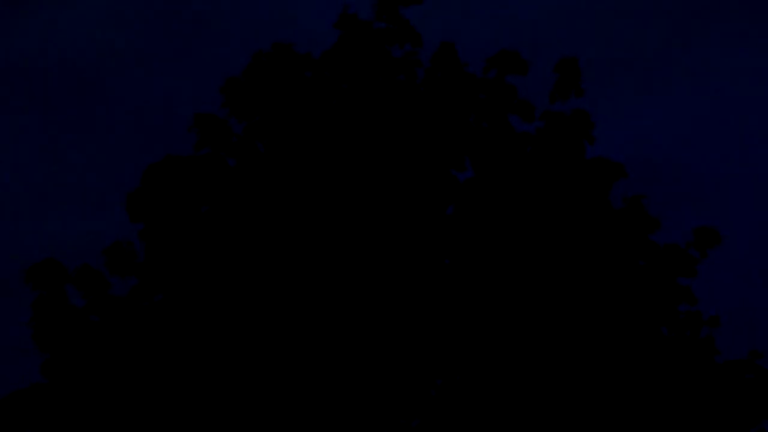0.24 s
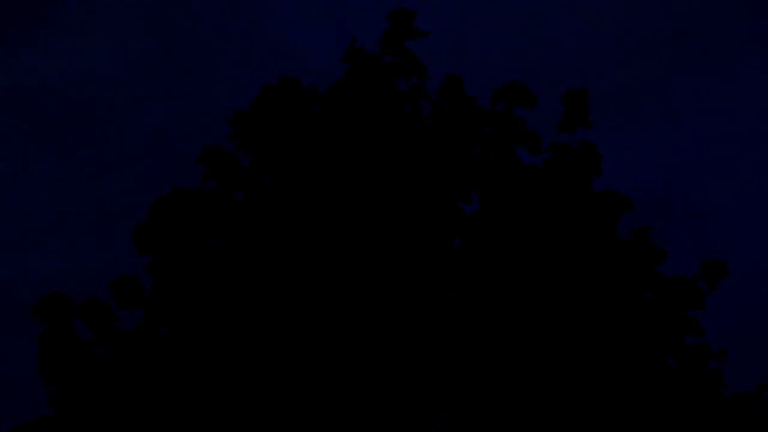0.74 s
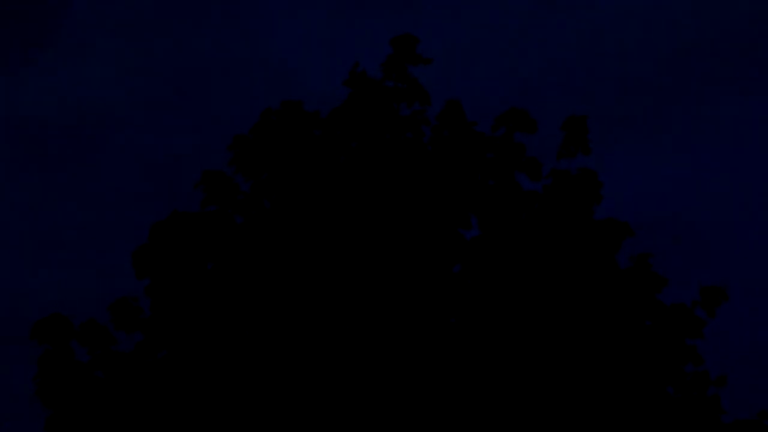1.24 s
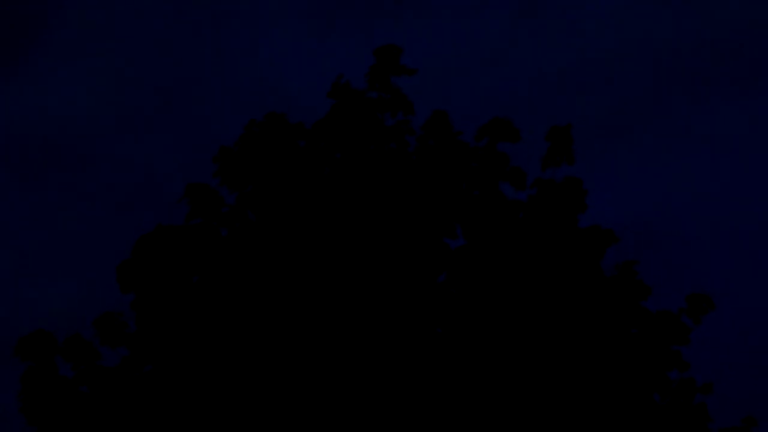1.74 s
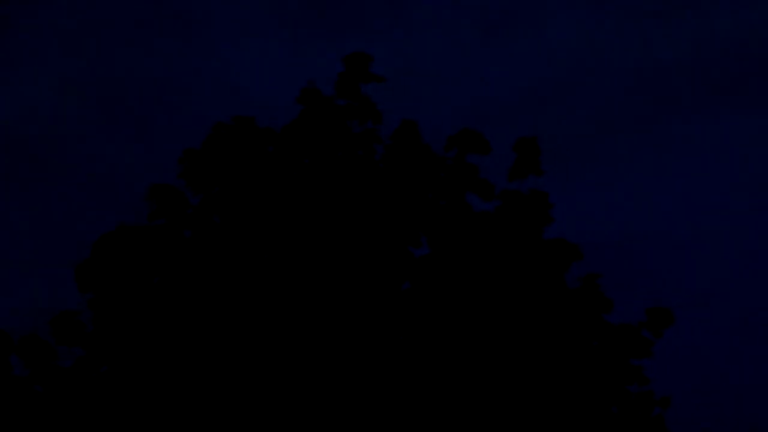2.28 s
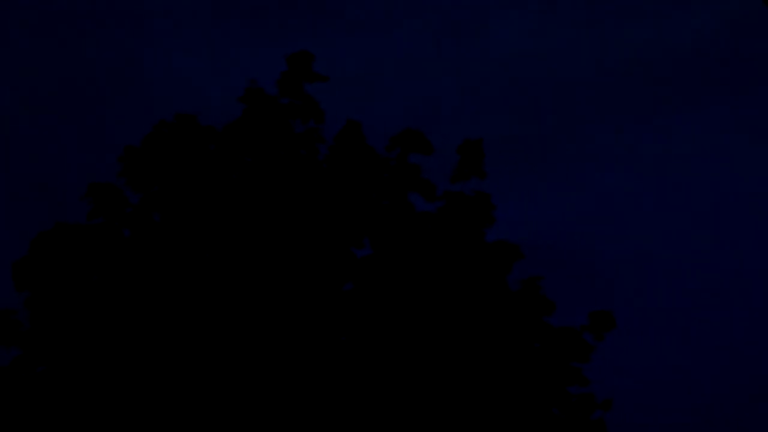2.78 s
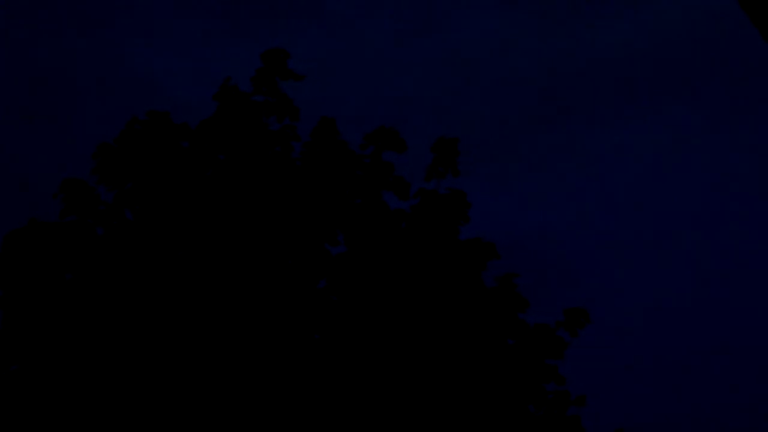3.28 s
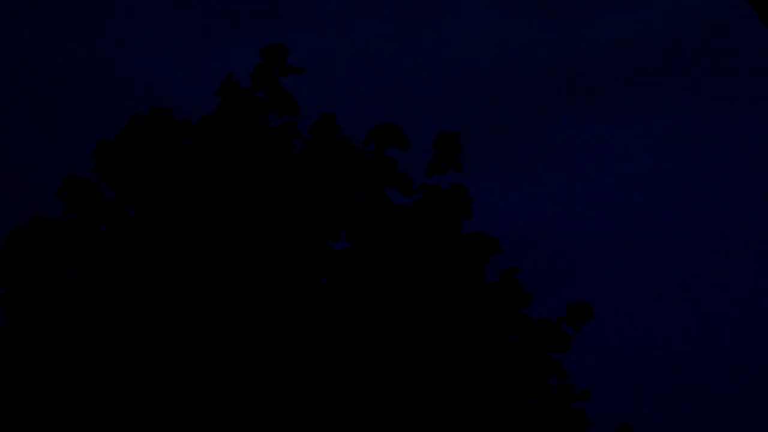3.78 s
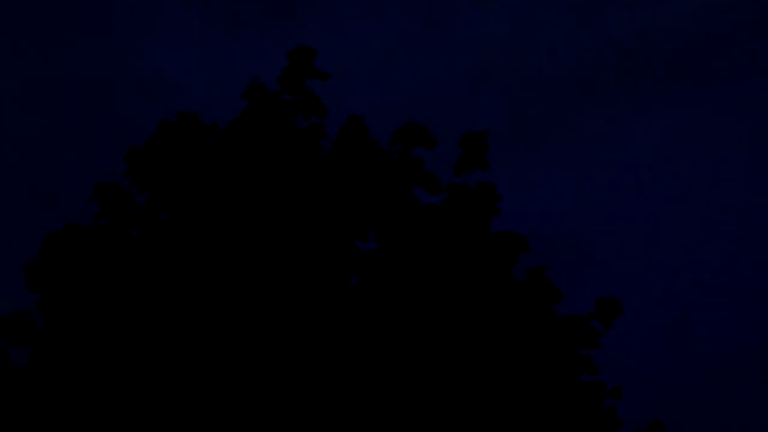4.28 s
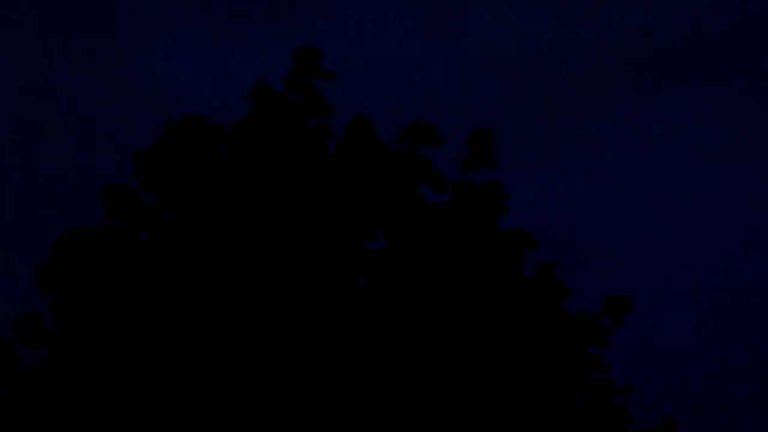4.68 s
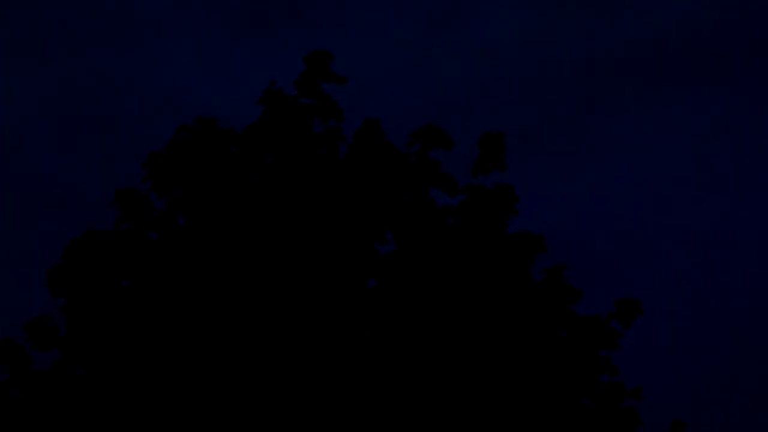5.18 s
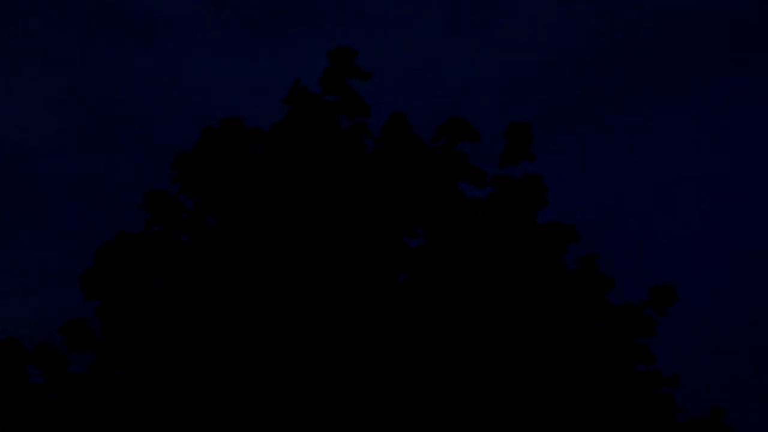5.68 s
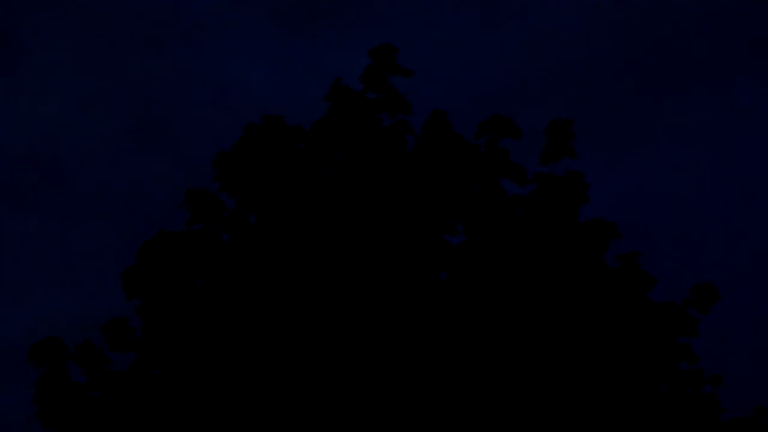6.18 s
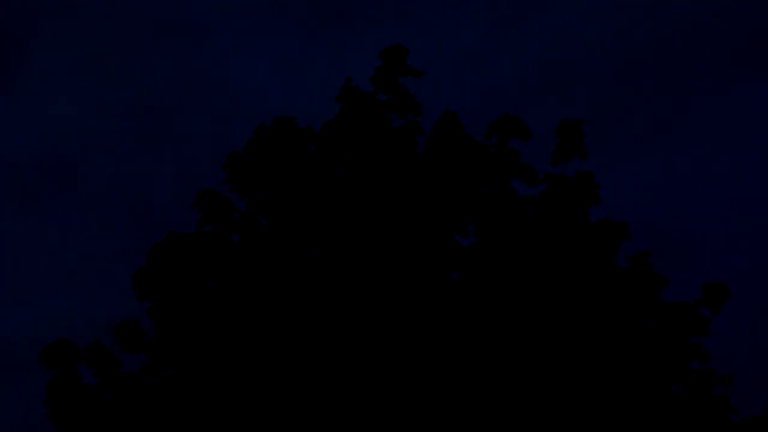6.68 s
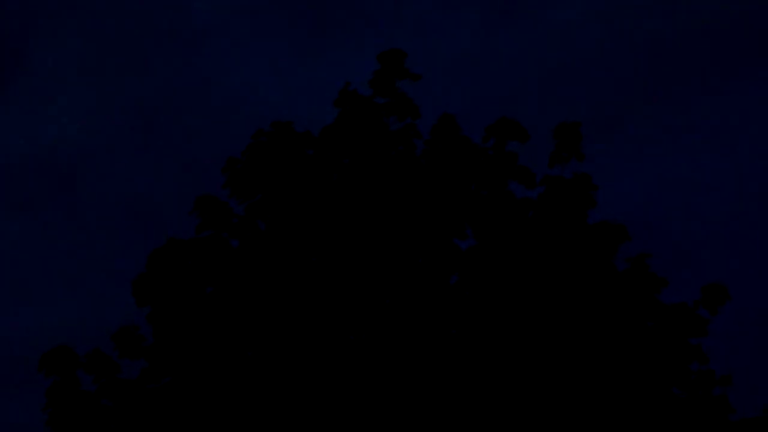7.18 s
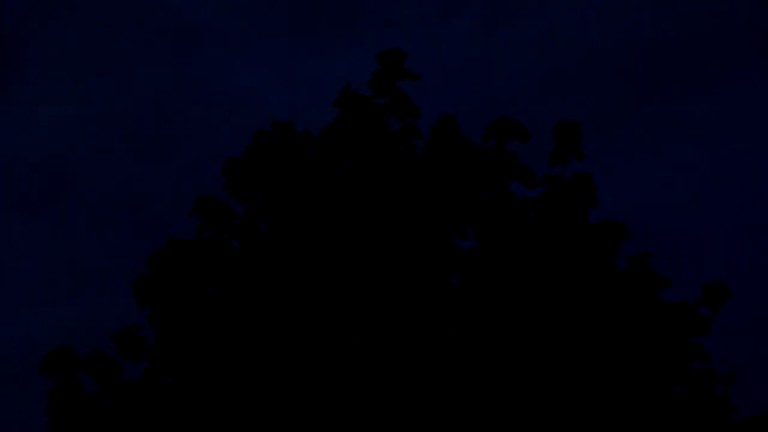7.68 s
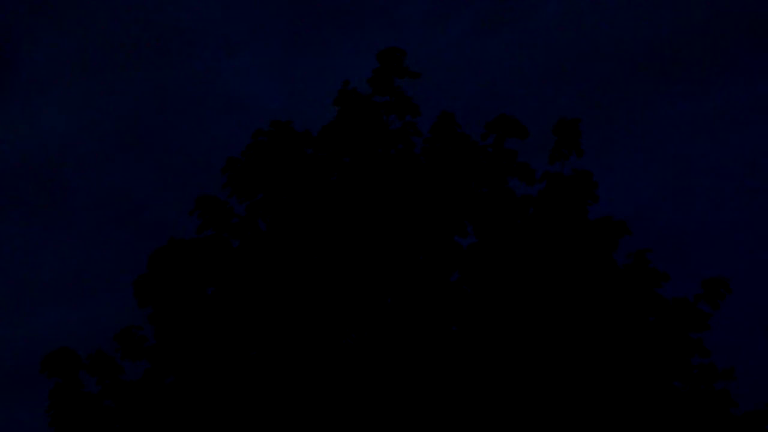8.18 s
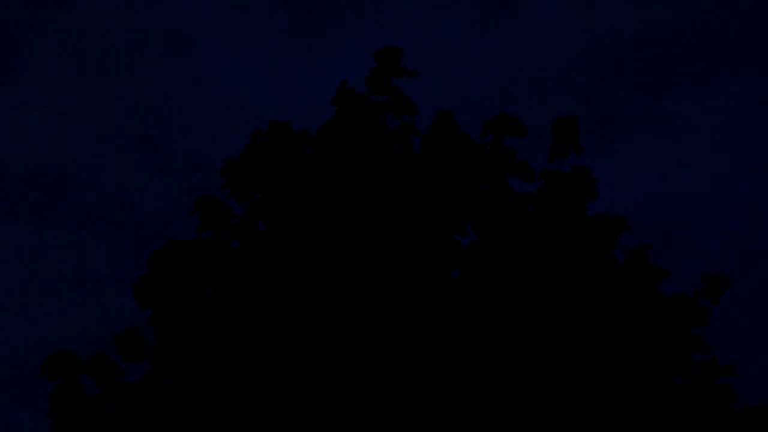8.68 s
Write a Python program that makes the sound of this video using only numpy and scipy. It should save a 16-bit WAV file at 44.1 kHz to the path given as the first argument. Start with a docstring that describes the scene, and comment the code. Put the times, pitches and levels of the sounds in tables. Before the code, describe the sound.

From a window facing dark trees, a small hand-held camera picks up a soft, reverberant dawn chorus. Clear, fluttering whistles slide briefly up or down among blurred warbles and countless distant notes. Handling knocks and a crisp plastic crackle occur in the first second, with lighter taps around five to six seconds. Birdsong is strongest near two and seven seconds and sparser at the end. Constant hiss, a thin whine, frame buzz and low hum lie beneath.

```python
"""Thrush-like whistlers sing a dawn chorus in the trees, heard from a window through a small hand-held camera.
Nearer birds are gliding sines with fluttering paths, blurred warbles are runs of scattered syllables, and a
far crowd is thousands of short random notes; noise-like echoes from trees and walls smear them all.
Beneath lie a faint town wash of shaped noise, low wavering sines, brief case taps and two high bird chips
(wavelets), a plastic crackle (ringing modes), and the camera's own hiss, whine and frame-rate buzz."""
import sys
import numpy as np
from scipy import signal
from scipy.fft import rfft, irfft
from scipy.io import wavfile
from scipy.ndimage import uniform_filter1d

SR = 44100
rng = np.random.default_rng(int(sys.argv[2]) if len(sys.argv) > 2 else 0)


def wav_record(signal):
    """Record a signal, one row per channel, as 16-bit PCM in the file named by sys.argv[1]."""
    frames = np.transpose(np.atleast_2d(signal))
    bounded = np.clip(frames, -1, 1)
    # unit amplitude maps onto the largest positive 16-bit level
    quanta = np.round(bounded * 32767).astype(np.int16)
    wavfile.write(sys.argv[1], SR, quanta)


N = 394254  # length in samples

# Far crowd's level in time: [t/s, level/dB]
CROWD_LEVEL = [(0.0, -55), (1.57, -55), (1.94, -55), (2.34, -55), (2.46, -50), (3.56, -58), (5.57, -54.5),
               (6.03, -55.5), (7.24, -51.5), (7.57, -52), (8.94, -57)]
# Loudness of a far note by its pitch: [f/Hz, level/dB]
CROWD_PITCH = [(1300, -25.5), (1500, -8), (1750, -1.5), (2000, 3), (2500, -3.5), (3000, -10.5), (3500, -21)]
# Distant wash, relative spectral density: [f/Hz, level/dB per Hz]
TOWN_SPECTRUM = [(20, 3), (100, -1.5), (290, -1.5), (420, -5.5), (1100, -2), (1600, -9), (3000, -10),
                 (5000, -41)]
# Wavering low hums, some of them probably camera frame buzz: [f/Hz, level/dB]
LOW_HUMS = [(99, -76.5), (128, -76), (190, -78), (232, -76), (293, -76)]
# Camera hiss, relative spectral density: [f/Hz, level/dB per Hz]
HISS_SPECTRUM = [(40, -0.5), (300, 7.5), (1000, 5.5), (2000, 2.5), (3600, 2), (5000, 0), (8000, -0.5),
                 (11000, -1), (14000, -1)]
# Clear whistles of nearer birds:
# [start t/s, length t/s, start f/Hz, end f/Hz, level/dB, scattered-to-direct sound ratio]
CLEAR_NOTES = [(.22, 0.15, 1820, 1780, -55, 1.3), (.449, 0.062, 1510, 1480, -56, 0.91),
               (0.468, 0.14, 2550, 2490, -57.5, 1.4), (.5, 0.11, 2080, 2450, -54, 1.2),
               (.688, 0.18, 2070, 2040, -59, .45), (.778, 0.17, 2970, 2870, -60, 1.24),
               (.843, 0.09, 2240, 2190, -54.5, 0.84), (0.956, 0.12, 2860, 2810, -58.5, 1.1),
               (1.14, 0.16, 2410, 2160, -58, .8), (1.491, 0.093, 2724, 2096, -50, 0.68),
               (1.55, 0.1, 2780, 3100, -61, .8), (1.622, 0.17, 3120, 3230, -60, 1.2),
               (1.743, 0.17, 2140, 2120, -47, 0.38), (1.876, .05, 2695, 2450, -47.5, .45),
               (1.91, 0.077, 2430, 2398, -42, 0.19), (1.894, .062, 3130, 3100, -58, .6),
               (1.98, 0.23, 2150, 2100, -50, 0.41), (2.038, 0.11, 2240, 2270, -53, 0.99),
               (2.097, .134, 1310, 1358, -56.5, 0.61), (2.23, 0.15, 3030, 3000, -60, .86),
               (2.286, 0.14, 1750, 1810, -41.5, 0.65), (2.297, 0.14, 2450, 2260, -46, .8),
               (2.409, 0.12, 1780, 1740, -47, 0.91), (2.599, .1, 1950, 1930, -55, .8),
               (2.359, 0.13, 3020, 3104, -50, 0.41), (2.475, .07, 4070, 4050, -62, .8),
               (2.496, 0.19, 3330, 3330, -59.5, 0.53), (2.49, 0.17, 3110, 3130, -53.5, 0.39),
               (2.603, 0.093, 4110, 4140, -65, 0.77), (2.654, 0.14, 3100, 3100, -61, 0.99),
               (2.722, 0.15, 3300, 3350, -62, 1.2), (2.8, 0.085, 2640, 2600, -53, .6),
               (2.847, 0.07, 1334, 1290, -56, .25), (2.877, 0.1, 3100, 3020, -67, 0.73),
               (3.008, 0.16, 4140, 3990, -62.5, 1), (3.048, 0.12, 3410, 3280, -58.5, .6),
               (3.122, 0.13, 5110, 5150, -65.5, 0.96), (3.175, .06, 4260, 4230, -66, .7),
               (3.173, 0.095, 2160, 2050, -50, 1.1), (3.23, 0.074, 3320, 2790, -52, .45),
               (3.276, .2, 2790, 2640, -57.5, 0.7), (3.961, 0.19, 1950, 1900, -52, 1.1),
               (4.066, 0.14, 2170, 2190, -57.5, 0.5), (4.172, 0.12, 3120, 2360, -57, .42),
               (4.327, 0.1, 1950, 1930, -51.5, 0.52), (4.6, 0.2, 2088, 2110, -53.5, 0.72),
               (4.71, 0.068, 2660, 2670, -68, .6), (4.869, 0.073, 2310, 2330, -59, .3),
               (4.87, .155, 1483, 1530, -55, .4), (5.138, 0.11, 2100, 1990, -52, 1.0),
               (5.163, .065, 1530, 1530, -59, 0.9), (5.29, 0.068, 3110, 2820, -58, 0.45),
               (5.33, 0.16, 2006, 2020, -57, 0.77), (5.39, .07, 2370, 2360, -61, 0.53),
               (5.588, .053, 2400, 2950, -58.5, 0.65), (5.613, 0.14, 2960, 2990, -58.5, 0.57),
               (5.755, 0.1, 2880, 2960, -61, 0.58), (5.799, 0.077, 1965, 1950, -52.5, 0.5),
               (5.932, 0.135, 1887, 1950, -52.5, .25), (5.9, 0.08, 3080, 3200, -69, 0.74),
               (6.067, .13, 1920, 1720, -57, 0.79), (6.231, 0.16, 2156, 2120, -52, .4),
               (6.32, 0.092, 1720, 1900, -53, .9), (6.447, 0.098, 2700, 2550, -59, 0.53),
               (6.55, 0.077, 2134, 2135, -50, 0.7), (6.618, .12, 2680, 2600, -60, 0.55),
               (6.67, 0.078, 1967, 1945, -46.5, .8), (6.73, 0.088, 1950, 1803, -43, 0.64),
               (6.746, 0.14, 2340, 2750, -53, 0.52), (6.816, .15, 2172, 1800, -47.5, 1),
               (6.869, 0.094, 2730, 3190, -48, 0.59), (6.96, .07, 3180, 3130, -59, 1.0),
               (6.984, 0.08, 2273, 2220, -43, .41), (6.985, 0.16, 2690, 2430, -41.5, .42),
               (7.098, 0.19, 1785, 2150, -51, 0.8), (7.128, 0.12, 2430, 2368, -40, 0.29),
               (7.225, 0.12, 2840, 2790, -48, 0.86), (7.335, 0.047, 3490, 2690, -48.5, .5),
               (7.368, .08, 2720, 2280, -44.5, .9), (7.43, 0.095, 2810, 3250, -52.5, .58),
               (7.524, 0.071, 3320, 3240, -58, .7), (7.633, 0.054, 3327, 3830, -65, .7),
               (7.725, 0.11, 2390, 2310, -53, .7), (7.96, .089, 1205, 1800, -52.5, 1.3),
               (7.998, 0.098, 2920, 3470, -60, .6), (8.012, 0.082, 1900, 2000, -49, 0.98),
               (8.662, 0.078, 2940, 2880, -53, .5)]
# Brief taps on the case, and two high bird chips: [t/s, peak level/dB, f/Hz, length/cycles]
TAPS_AND_CHIPS = [(0.342, -41, 470, 1.7), (0.358, -33, 910, 0.84), (0.3754, -28, 584, 0.94),
                  (0.379, -40, 500, 2.3), (4.627, -45, 520, 3.2), (4.983, -45, 3200, 8.7),
                  (5.290, -42.5, 535, 1.2), (5.458, -39.5, 550, 1.9), (5.5854, -30, 1750, 2.4),
                  (5.766, -37, 910, 1.1), (5.789, -42, 600, 1.2), (7.711, -49, 4300, 25.0)]
# Dry plastic crackle: [t/s, peak level/dB, share of the highest mode 0-1]
CRACKLE_BURSTS = [(0.416, -46, .5), (0.9388, -33, 0.8), (0.940, -36, 0.6), (0.9418, -30.5, 0.6),
                  (0.9434, -33, .2), (0.945, -31, 0.45), (0.946, -41, .2), (0.9482, -38, 0.5),
                  (0.952, -39, 0.2), (0.956, -30.5, 0.5), (0.9582, -35, 0.3), (4.180, -42, 0.5)]
# Resonances of the plastic: [f/Hz, bandwidth/Hz, relative level/dB]
PLASTIC_MODES = [(2500, 6200, 1), (7800, 430, 14.5), (10600, 1400, 12.5)]
# Blurred warbles deep in the foliage:
# [start t/s, length t/s, start f/Hz, end f/Hz, pitch spread/Hz, level/dB]
BLURRED_WARBLES = [(1.49, .12, 2360, 2065, 99, -53.5), (1.67, .12, 2560, 2120, 99, -55.5),
                   (2.28, .2, 2327, 2200, 99.4, -56.5), (2.39, 0.16, 1680, 1620, 69.6, -54.5),
                   (2.5, 0.22, 2195, 2272, 129.6, -50.5), (2.56, 0.19, 1853, 1902, 70, -52),
                   (2.78, .24, 1966, 1760, 120.6, -54.5), (5.11, 0.22, 1690, 1923, 89.4, -53.5),
                   (5.44, .13, 2080, 2295, 101, -49.5), (6.01, 0.18, 2365, 2380, 60, -57.5),
                   (6.31, .2, 1720, 1946, 131.3, -48), (6.56, .18, 1813, 1795, 70, -51),
                   (6.9, .22, 2005, 1925, 101, -53.5), (7.35, 0.14, 2337, 1964, 150.5, -51),
                   (7.401, 0.17, 2580, 2290, 200, -49), (7.5, 0.16, 2215, 1800, 180, -47.5),
                   (3.24, 0.11, 2016, 1760, 81, -53), (7.73, .26, 2123, 2050, 69, -56),
                   (8.1, .12, 2100, 2310, 90, -49.5), (8.2, 0.073, 2120, 1708, 119, -51),
                   (8.232, 0.082, 1683, 1250, 148.4, -46), (7.682, .2, 2944, 2940, 150, -62),
                   (8.451, 0.36, 2910, 3080, 251, -64)]

TREES_T60_S, TREES_DB = 0.78, -3.5  # echo decay time and level
RUSTLE_PER_S, RUSTLE = 120, 1  # moving leaves blur the echoes: rate and depth
TOWN_DB, HISS_DB, WHINE_DB = -60.5, -55.5, -67.5
FRAME_HZ, ROWS, FRAME_START = 66.06, 131, .646  # frame rate, rows per frame, start offset in frames
CARRY, SAG_DB = 0.21, -4.5  # share of a frame's hiss that returns inverted in the next; fall over a frame
LOUDEST_AT = .45  # share of a note's length
FALL_DONE, RISE_DONE = .7, .45  # share of the glide done by then: falls level out, rises climb evenly
SYLLABLE_S, WARBLE_SCATTER = .06, 1.28
TOP_HZ = 14000  # upper band limit


def undb(db):
    """A level in decibels is twenty times the logarithm of the amplitude ratio."""
    return 10 ** (np.asarray(db) / 20)


def level(x, db):
    """The root-mean-square amplitude sets the level."""
    return x * undb(db) / np.sqrt(np.mean(x ** 2))


def gain_at(hz, spectrum):
    """Spectral gain is interpolated in decibels along logarithmic frequency."""
    at, db = np.transpose(spectrum)
    return undb(np.interp(np.log(hz + 1e-9), np.log(at), db))


def coloured(spectrum):
    """White noise weighted in frequency takes on the given spectrum."""
    white = rfft(rng.standard_normal(N))
    return irfft(white * gain_at(np.fft.rfftfreq(N, 1 / SR), spectrum), N)


def walk(rate):
    """Random fluctuation: values held 1 / rate s and smoothed twice, with a spread near 1."""
    hold = int(SR / rate)
    steps = np.repeat(rng.standard_normal(N // hold + 1), hold)
    return 1.282 * uniform_filter1d(uniform_filter1d(steps, hold), hold)[:N]


def add(out, s, sound):
    """Superposition: a sound adds to the mixture from time s."""
    i = max(int(s * SR), 0)
    out[i:i + len(sound)] += sound[:max(N - i, 0)]


def whistles(notes, edge_db, waver):
    """Multipath interference: paths of drifting phase off moving leaves make gliding sines fade and blur."""
    out, wobble = np.zeros(N), walk(70)
    slow = walk(40) + 1j * walk(40)
    quick = walk(330) + 1j * walk(330)
    # each note reads the shared fluctuations at a random place
    places = (rng.random(len(notes)) * (N - SR)).astype(int)
    for (start, rise, fall, *hz, db, scatter), at in zip(notes, places):
        t = np.arange(0, rise + fall, 1 / SR)
        knots = [0, rise, rise + fall]
        chance = slice(at, at + len(t))
        pitch = np.interp(t, knots, hz) * (1 + waver * scatter * wobble[chance])
        phase = 2 * np.pi * np.cumsum(pitch) / SR
        swell = undb(db + np.interp(t, knots, [edge_db, 0, edge_db]))
        ramp = np.clip(np.minimum(t, rise + fall - t) / 0.0084, 0, 1)  # the syrinx starts and stops softly
        # deep in the foliage the quick shiver takes over
        sway, shiver = 0.55 * scatter, 0.74 * scatter ** 2
        paths = 1 + sway * slow[chance] + shiver * quick[chance]
        paths /= np.sqrt(1 + 2 * sway ** 2 + 2 * shiver ** 2)
        add(out, start, np.sqrt(2) * swell * ramp * (paths * np.exp(1j * phase)).imag)
    return out


def trees(x, t60_s):
    """Reverberation: dense echoes from leaves and walls decay exponentially, by 60 dB in t60_s."""
    t = np.arange(int(1.2 * SR)) / SR
    onset = np.clip(t / 0.014, 0, 1)
    tail = rng.standard_normal(len(t)) * np.exp(-np.log(1000) * t / t60_s) * onset
    return signal.fftconvolve(x, tail / np.sqrt(np.sum(tail ** 2)))[:N]  # unit-energy response


def crowd(count=3000):
    """Many sources superpose: short random notes, mostly sweeping, loudest in mid range, with much echo."""
    when, length, pick, bend, slope, size = rng.random((count, 6)).T
    when = (np.arange(count) + when) / count * N / SR
    hz = 1300 * (3500 / 1300) ** pick
    glide = 1 + 0.0574 * (slope - .5) + 0.81 * (slope - .5) ** 3
    length = 0.02913 + .08 * length
    rise = length * (0.202 + 0.608 * bend)
    note_db = 20 * np.log10(gain_at(hz, CROWD_PITCH)) + 13 * size ** 2
    scatter = np.full(count, 1.2)
    notes = np.transpose([when, rise, length - rise, hz / glide, hz, hz * glide, note_db, scatter])
    sung = whistles(notes, edge_db=-4.5, waver=0.00788)
    s, db = np.transpose(CROWD_LEVEL)
    envelope = undb(np.interp(np.arange(N) / SR, s, db))
    return level(1.28 * sung + trees(sung, t60_s=1.0), 0) * envelope


def town():
    """Broadband noise: a dull distant wash whose level drifts slowly."""
    return level(coloured(TOWN_SPECTRUM), TOWN_DB) * undb(0.61 * walk(1.84))


def low_hums():
    """Slow modulation: low sines waver in pitch and level."""
    hums = np.zeros(N)
    for hz, db in LOW_HUMS:
        loudness = undb(db + 1.6 * walk(3.5))
        cycles = hz * np.cumsum(1 + 0.01227 * walk(4)) / SR
        hums += loudness * np.sin(2 * np.pi * cycles)
    return np.sqrt(2) * hums


def camera():
    """Periodic modulation: sensor read-out makes hiss jump up and sag each frame, and a row-rate whine."""
    frames = np.arange(N) * FRAME_HZ / SR - FRAME_START
    # hiss partly returns inverted one frame later
    delay = np.exp(-2j * np.pi * np.fft.rfftfreq(N, 1 / SR) / FRAME_HZ)
    hiss = irfft(rfft(coloured(HISS_SPECTRUM)) / (1 + CARRY * delay), N)
    hiss *= undb(SAG_DB * (frames % 1) + 0.5 * walk(6))
    # the whine changes sign every frame, passing through zero just before a frame starts
    flip = np.clip(np.sin(np.pi * (frames + 0.072)) / 0.27, -1, 1)
    whine = flip * np.sin(2 * np.pi * ROWS * frames)
    return level(hiss, HISS_DB) + level(whine, WHINE_DB)


def near_birds():
    """Frequency glide: each clear note swells to its loudest point while its pitch moves from first to last."""
    start, length, first, last, db, scatter = np.transpose(CLEAR_NOTES)
    middle = first + np.where(last < first, FALL_DONE, RISE_DONE) * (last - first)
    rise = LOUDEST_AT * length
    notes = np.transpose([start, rise, length - rise, first, middle, last, db, scatter])
    return whistles(notes, edge_db=-5.0, waver=0.0074)


def taps_and_chips():
    """Short transient: each tap or chip is a cosine of a few cycles under a Gaussian envelope."""
    out = np.zeros(N)
    for s, db, hz, cycles in TAPS_AND_CHIPS:
        u = np.arange(-2 * cycles / hz, 2 * cycles / hz, 1 / SR)
        envelope = np.exp(-(2.8 * u * hz / cycles) ** 2)
        add(out, s + u[0], -undb(db) * np.cos(2 * np.pi * hz * u - .5) * envelope)
    return out


def crackle():
    """Modal resonance: millisecond noise bursts ring three broad modes of the plastic."""
    t = np.arange(256) / SR
    out = np.zeros(N)
    for s, db, high in CRACKLE_BURSTS:
        burst = rng.standard_normal(len(t)) * np.exp(-t / .0007)
        ring = np.zeros(len(t))
        for (hz, width, mode_db), share in zip(PLASTIC_MODES, (.5, 1 - high, high)):
            resonator = signal.iirpeak(hz, hz / width, SR)
            ring += share * undb(mode_db) * signal.lfilter(*resonator, burst)
        add(out, s, undb(db) * ring / np.abs(ring).max())
    return out


def warbles(count=8):
    """Overlapping partial sounds fuse: each warble is a run of syllables scattered around a gliding pitch."""
    rows = []
    for start, length, first, last, spread_hz, db in BLURRED_WARBLES:
        half = min(SYLLABLE_S, length) / 2
        syllable_db = db + 10 * np.log10(length / (2 * half * count))  # shares the power among syllables
        for k, (late, off) in enumerate(rng.random((count, 2))):
            at = (k + late) / count * (length - 2 * half)
            glide = first + (last - first) * (at + np.arange(3) * half) / length
            hz = glide + spread_hz * (2 * off - 1) * np.sqrt(3)  # uniform scatter, deviation spread_hz
            rows.append((start + at, half, half, *hz, syllable_db, WARBLE_SCATTER))
    return whistles(rows, edge_db=-4.5, waver=0.0075)


def scene():
    """Linear superposition: direct song, its rustled echoes, the far crowd and the other sounds add up."""
    near = near_birds() + warbles()
    rustled = near * (1 + RUSTLE * walk(RUSTLE_PER_S)) / np.sqrt(1 + RUSTLE ** 2)
    birds = near + undb(TREES_DB) * trees(rustled, TREES_T60_S) + crowd()
    return (birds + town() + low_hums() + taps_and_chips() + crackle() + camera())[None]


def record(dry):
    """Band limiting: an elliptic low-pass filter cuts the top steeply."""
    low_pass = signal.ellip(12, .2, 75, TOP_HZ, fs=SR, output="sos")
    return signal.sosfilt(low_pass, dry)


dry = scene()
out = record(dry)
wav_record(out)
```